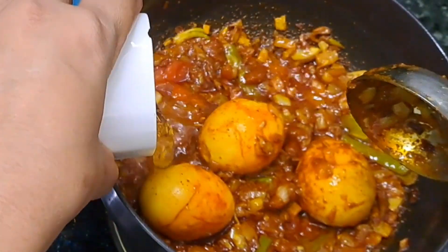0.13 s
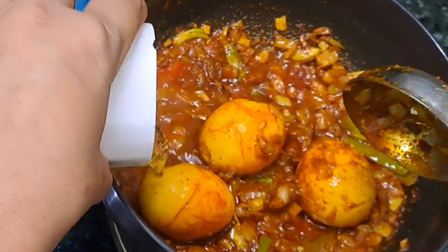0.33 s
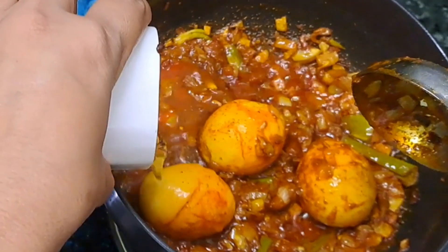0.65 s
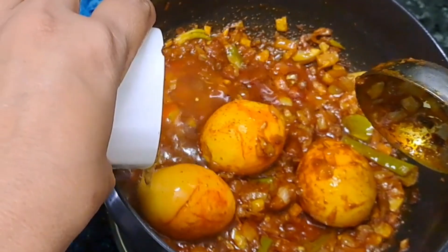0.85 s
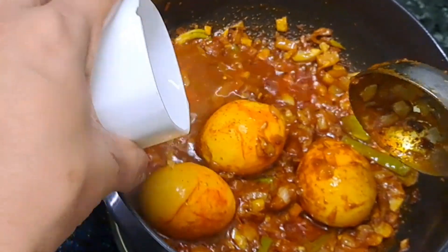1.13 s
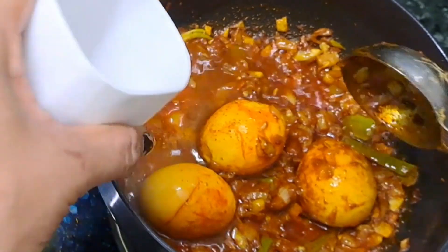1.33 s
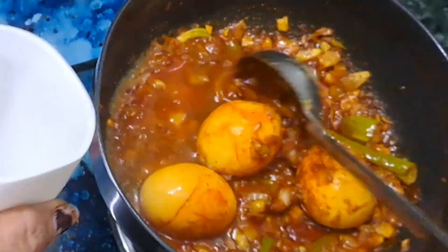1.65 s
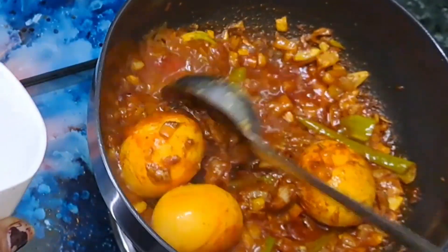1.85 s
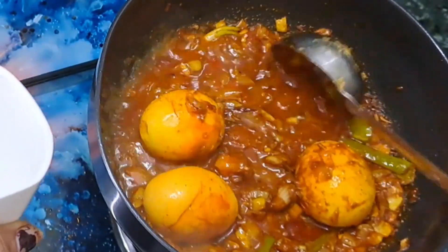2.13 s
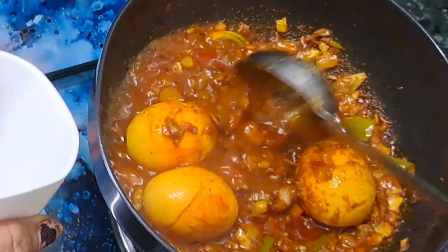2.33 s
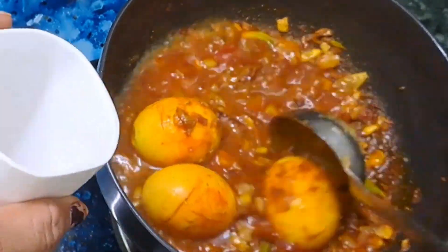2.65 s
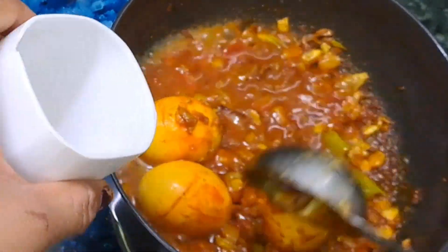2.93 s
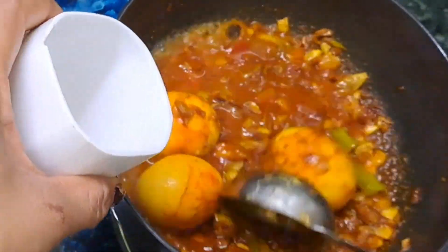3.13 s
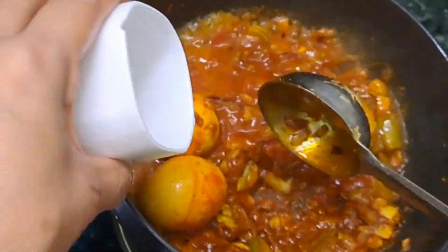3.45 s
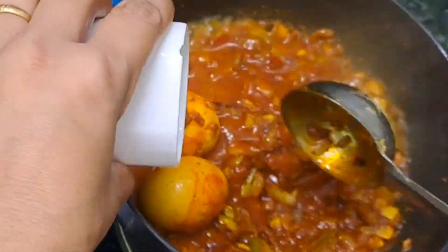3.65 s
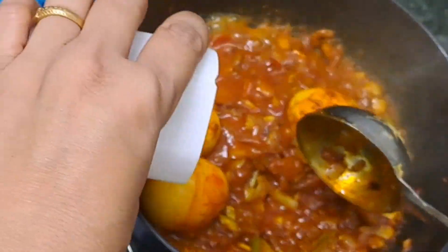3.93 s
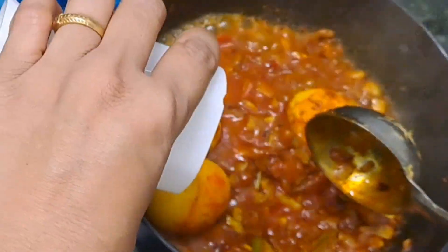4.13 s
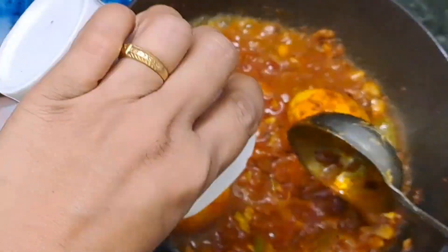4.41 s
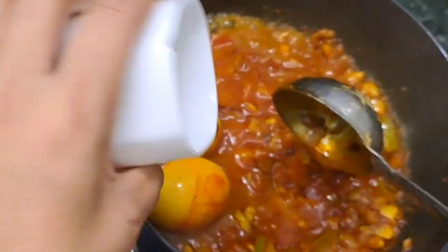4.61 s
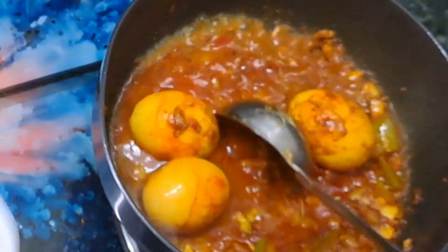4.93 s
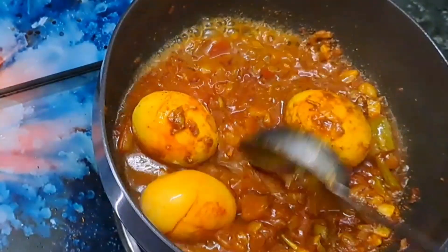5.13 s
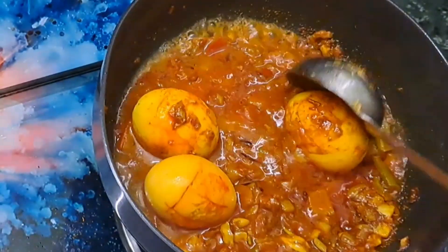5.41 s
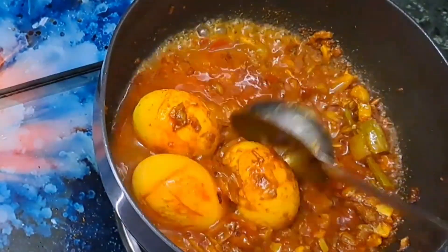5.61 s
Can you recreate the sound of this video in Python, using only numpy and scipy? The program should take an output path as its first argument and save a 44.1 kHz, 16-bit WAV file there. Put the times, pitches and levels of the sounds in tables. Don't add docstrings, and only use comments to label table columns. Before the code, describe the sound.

A very close stereo sizzle of thick sauce in a hot metal pan, in a small home kitchen with a faint low fan hum. From 0 to 0.9 s the frying is fairly thin and crackly: a sharp tick at the start, many tiny oil spits, and a cluster of hard cracks near 0.4 s. From about 0.9 s the added water thickens it into dense, wet boiling, strongest around 2 to 2.4 s, the separate pops drowned. From 1.3 s onward brief, high metallic rings, like tiny tinny chirps, dart through the hiss as the ladle stirs. The boil eases by 2.8 s, then flares around 3.5 s with loud snaps leaning left and a brighter, finer fizz. After 4 s it gradually sinks to a softer, steady, fine hiss with sparser rings. One faint dull ladle thud comes at 5.55 s, and the sizzle continues to the end near 6 s.

```python
import sys
import numpy as np
from scipy import signal
from scipy.fft import rfft, irfft
from scipy.io import wavfile
from scipy.ndimage import uniform_filter1d

SR = 44100
rng = np.random.default_rng(int(sys.argv[2]) if len(sys.argv) > 2 else 0)


def ratio_of_db(decibels):
    return 10 ** (np.asarray(decibels, float) / 20)


def digitize_waveform(pressure):
    field = np.atleast_2d(pressure).T
    bounded = np.clip(field, -1, 1)
    quanta = np.round(bounded * 32767).astype(np.int16)
    wavfile.write(sys.argv[1], SR, quanta)


N = 254456

# (time [s], boiling strength [dB], fineness of the bubbles [dB])
BOIL_COURSE = [(0, -37.5, 2), (.3, -38.5, 3), (.84, -35, 1), (.92, -31.5, 1.5), (1.32, -28.5, -1.5),
               (1.8, -26.5, -1), (1.98, -24, 0), (2.38, -25, 0), (2.8, -28, -1), (2.96, -27.5, 2),
               (3.4, -27, 1.5), (3.57, -24.5, 2.5), (3.75, -25.5, 4), (4.05, -27.5, 5), (4.25, -29, 4),
               (5.0, -31.5, 4.5), (5.38, -32.5, 4), (5.6, -31, 4)]
# (frequency [Hz], gain [dB])
LEFT_RESPONSE = [(450, -29.5), (720, -21), (765, -14), (1200, -15.5), (2050, -11.5), (2880, -6), (3060, -4),
                 (4900, 2.5), (6000, -1), (7200, -13), (8800, -13), (10800, -6), (13000, -19), (15400, -17)]
# (frequency [Hz], gain [dB])
RIGHT_RESPONSE = [(450, -31), (720, -23), (765, -15), (1250, -14), (1600, -16.5), (2000, -15.5),
                  (2900, -10.5), (4500, -8.5), (6300, -12.5), (7200, -8.5), (9800, -16.5), (11600, -9),
                  (13300, -14.5), (15400, -9)]


def evened(x):
    return x / np.sqrt(np.mean(x ** 2) + 1e-20)


def read_spectrum(points, hz):
    f, value = np.transpose(points)
    return np.interp(np.log(hz + 1), np.log(f + 1), value)


def curve(rows, column):
    rows = np.array(rows)
    return np.interp(np.arange(N) / SR, rows[:, 0], rows[:, column])


def bumps(rows, order=2):
    t = np.arange(N) / SR
    return np.array([np.exp(-abs((t - row[0]) / row[2]) ** order) for row in rows])


def wander(per_s):
    return evened(signal.lfilter(*signal.butter(2, per_s, fs=SR), rng.standard_normal(N)))


def add(mix, s, sound):
    part = mix[..., round(s * SR):][..., :sound.shape[-1]]
    part += sound[..., :part.shape[-1]]


def ring(x, hz, width):
    return signal.lfilter(*signal.iirpeak(hz, hz / width, SR), x)


def resonate(x, hz, width, order=1):
    turn = np.exp(2j * np.pi * np.cumsum(hz) / SR)
    r = np.exp(-np.pi * width / SR)
    low = x / turn
    for _ in range(order):
        low = signal.lfilter([1 - r], [1, -r], low)
    return 2 * (turn * low).real


def causal(points):
    log_gain = np.log(ratio_of_db(read_spectrum(points, abs(np.fft.fftfreq(4096, 1 / SR)))))
    phase = -signal.hilbert(log_gain).imag
    return np.fft.ifft(np.exp(log_gain + 1j * phase)).real[:2048]


def through_ports(x):
    ports = np.array([causal(LEFT_RESPONSE), causal(RIGHT_RESPONSE)])
    return signal.oaconvolve(x, ports, axes=1)[:, :N]


def bursts(per_s, spread_db, lead, scatter):
    when = np.flatnonzero(rng.random(N) < per_s / SR)
    chance, sign, place = rng.standard_normal((3, len(when)))
    size = ratio_of_db(spread_db * np.minimum(chance ** 2, 4)) * np.sign(sign)
    lead = np.round(lead + scatter * place * abs(place)).astype(int)
    early = np.clip(when - lead, 0, N - 1)
    return np.array([np.bincount(when, size, N), np.bincount(early, size, N)])


def hot_spots(x, patchy_db, wide, long):
    z = signal.stft(x, nperseg=256, noverlap=192)[2]
    patches = rng.standard_normal(z.shape[1:])
    for _ in range(2):
        patches = uniform_filter1d(patches, wide, 0)
        patches = uniform_filter1d(patches, long, 1)
    patchy = z * ratio_of_db(patchy_db * evened(patches))
    return signal.istft(patchy, nperseg=256, noverlap=192)[1][:, :N]


def boil():
    # (time [s], gain [dB], half length [s], extra for small bubbles [dB])
    flares = [
        (0, 0, 0.0087, 9.5),
        (0.13, 1.5, .05, -1.5),
        (0.388, 2, .011, 2),
        (0.638, 2, .025, -2),
        (0.694, 3, 0.017, -1.5),
    ]
    # (time [s], change [dB], half length [s])
    bowl_changes = [
        (1.1, -10, 0.74),
        (4.45, 7, 1),
    ]
    full_boil_db = -24.5
    t = np.arange(N) / SR
    strength_db, fine_db = curve(BOIL_COURSE, 1), curve(BOIL_COURSE, 2)
    flare_db, small_db = np.transpose(flares)[[1, 3]] @ bumps(flares)
    below_db = strength_db - full_boil_db
    large_db = full_boil_db - 8 + 0.84 * below_db - 0.34 * fine_db
    levels_db = np.array([large_db, strength_db, strength_db + fine_db + small_db]) + flare_db
    loose_spits_db = -15.5 - 0.69 * below_db
    bowl_db = -6 + np.transpose(bowl_changes)[1] @ bumps(bowl_changes, order=3)
    lean_db = 0.53 * (t - t.mean())
    return levels_db, loose_spits_db, bowl_db, lean_db


def sizzle():
    # (frequency [Hz], width [Hz], level [dB])
    wall_modes = [(589, 9.5, -7.5), (654, 14, -21), (780, 23, -13), (1424, 38, -14), (1520, 40, -14.5),
                  (1658, 140, -15.5)]
    # (frequency [Hz], width [Hz], level [dB])
    bowl_modes = [(3130, 54, -16), (3770, 40, -4), (4990, 240, -6.5), (5910, 360, -10.5), (11830, 800, -2)]
    # (time [s], high pitch [Hz], boost [dB], low pitch [Hz], boost [dB])
    air_gap = [(0, 3650, -18, 1005, 2), (.92, 3340, -3, 1027, 5), (1.3, 3400, -2.5, 976, 0),
               (1.72, 3750, -4.5, 945, 3), (2.4, 3670, -12, 1000, -8), (3.2, 3450, -14, 940, -10),
               (3.5, 3500, -7, 1015, -4), (4.2, 3860, -35, 1034, 2), (5.77, 3740, -27, 1003, -3)]
    levels_db, loose_spits_db, bowl_db, lean_db = boil()
    spurts_db, loose_gain = wander(31), ratio_of_db(loose_spits_db)
    low_hz, high_hz = 2800, 7500
    # (band edge [Hz], filter, depth of spurts, loose spits [dB], wide spits [dB])
    sizes = [(low_hz, "low", .2, .3, -8),
             ((low_hz, high_hz), "band", .6, -2, -3),
             (high_hz, "high", .7, 2.5, 0.)]
    wide_spits = evened(bursts(300, 1.33, 8.6, 4))
    out = np.zeros((2, N))
    for level_db, (edge, kind, shared_db, loose_db, wide_db) in zip(levels_db, sizes):
        fizz = evened(bursts(9000, 1.3, 4.5, 3.0)) * ratio_of_db(shared_db * spurts_db)
        loose = ratio_of_db(loose_db) * evened(bursts(300, 3.8, 4.5, 3)) + ratio_of_db(wide_db) * wide_spits
        fizz = hot_spots(fizz, 1.0, wide=3, long=14) + loose * loose_gain
        size_band = signal.butter(6, edge, kind, fs=SR, output="sos")
        fizz = signal.sosfilt(size_band, through_ports(fizz))
        if kind == "low":
            fizz = fizz + sum(ratio_of_db(db + 12.0) * ring(fizz, hz, w) for hz, w, db in wall_modes)
            fizz = fizz + ratio_of_db(curve(air_gap, 4)) * resonate(fizz, curve(air_gap, 3), 33)
        else:
            fizz = fizz + ratio_of_db(bowl_db) * sum(ratio_of_db(db) * ring(fizz, hz, w) for hz, w, db in bowl_modes)
        if kind == "band":
            fizz = fizz + ratio_of_db(curve(air_gap, 2)) * resonate(fizz, curve(air_gap, 1), 1200, order=2)
        loudness = (1 + loose_gain ** 2) * np.mean(fizz.mean(0) ** 2)
        out += fizz / np.sqrt(loudness) * ratio_of_db(level_db)
    return out * ratio_of_db(np.outer([.15, -.5], lean_db))


def kitchen():
    # (frequency [Hz], density [dB per Hz])
    room_spectrum = [(15, -37), (25, -11), (75, 3.5), (101, -2.5), (183, -12.5), (303, -4), (352, -6),
                     (414, -4.5), (500, -6), (650, -16), (1100, -120)]
    # (frequency [Hz], left-right likeness [0..1])
    coherence = [(30, 1), (100, 0.68), (160, 0.2), (270, 0.96), (700, 0.21)]
    # (time [s], peak level [dB], half length [s])
    hum_swells = [(0, -54, 0.08), (.18, -56, 0.037), (.42, -54, 0.22), (0.776, -50, 0.1),
                  (1.078, -58, 0.093), (1.33, -54, .04), (1.553, -54, 0.076), (1.88, -50, .07),
                  (2.08, -54, .1), (2.33, -53, 0.086), (2.76, -50, 0.11), (3.12, -60, .07),
                  (3.335, -55, .07), (3.915, -58, .04), (4.222, -53, .07), (4.752, -61, 0.23),
                  (5.15, -50, .14), (5.462, -53, .06), (5.76, -55, 0.091)]
    # (frequency [Hz], width [Hz], level [dB])
    fan_tones = [(297.9, 13, -68), (401.8, 2.3, -65.5)]
    hz = np.fft.rfftfreq(N, 1 / SR)
    left, other = rfft(rng.standard_normal((2, N)))
    same = np.clip(read_spectrum(coherence, hz), 0, 1)
    right = same * left + np.sqrt(1 - same ** 2) * other
    pair = np.array([left, right]) * ratio_of_db(read_spectrum(room_spectrum, hz))
    bass = 1 / (1 + (hz / 105) ** 8)
    air = ratio_of_db(-57) * evened(irfft(pair * np.sqrt(1 - bass), N))
    rumble = evened(irfft(pair * np.sqrt(bass), N))

    turns = np.cumsum(19.9 * (1 + 0.018 * wander(2.8))) / SR
    orders = [(3, -8), (4, -1), (5, -9)]  # (multiple, level [dB])
    blades = evened(sum(ratio_of_db(db) * np.sin(2 * np.pi * (k * turns + rng.random())) for k, db in orders))
    swell = ratio_of_db(-66.5) + ratio_of_db(np.transpose(hum_swells)[1]) @ bumps(hum_swells, order=3)
    hum = swell * (0.37 * rumble + 0.51 * blades)

    tones = np.zeros(N)
    for f, w, db in fan_tones:
        tones += ratio_of_db(db) * evened(ring(ring(rng.standard_normal(N), f, w), f, w))
    tones = tones * ratio_of_db(3.0 - 1.04 * np.arange(N) / SR)
    hiss_db = curve(BOIL_COURSE, 1) + curve(BOIL_COURSE, 2)
    duck_db = -.35 * np.maximum(hiss_db + 29.5, 0)
    return (air + tones) * ratio_of_db(1.5 + duck_db) + hum * ratio_of_db([[.7], [-.7]])


def cracks():
    # (time [s], peak level [dB], left-right difference [dB])
    oil_cracks = [(.0005, -10, 4), (0.378, -9, -2), (.3803, -15, 3), (.3847, -17, 4), (.3902, -20, 3),
                  (0.392, -16, 3), (3.516, -4, 9), (3.5565, -8, 7)]
    clicks = np.zeros((2, N))
    for s, db, pan_db in oil_cracks:
        sides_db = np.array([[pan_db / 2 + 13.0], [-pan_db / 2 + 1.0]])
        add(clicks, s, np.array([[0.92, -0.84]]) * ratio_of_db(db + sides_db))
    return through_ports(clicks)


def spits():
    # (time [s], peak level [dB])
    small_spits = [(.056, -28), (.0987, -26), (.1027, -25), (.1292, -23), (.1484, -18), (.1795, -26),
                   (.194, -23), (.2638, -28), (.3022, -28), (.3187, -24), (.3411, -26), (.3774, -20),
                   (.4194, -21), (.4383, -20), (.4796, -25), (.5227, -27), (.5282, -29), (.6399, -31),
                   (.7821, -24), (.7966, -24), (.8106, -21), (.819, -20), (.8684, -31), (.8984, -24),
                   (0.904, -20), (.9782, -28)]
    # (time [s], peak level [dB], pitch [Hz])
    middle_spits = [(.0588, -31, 4990), (.098, -21.5, 4880), (.1251, -30, 5080), (.1307, -26, 5220),
                    (.243, -30, 6230), (.303, -28, 5390), (.3637, -28, 5300), (.3745, -28, 5180),
                    (.42, -35, 4850), (.4708, -31, 5210), (.523, -29, 4400), (.5268, -28, 5250),
                    (.5646, -30, 5110), (.624, -29, 4190), (.632, -25, 5230), (.686, -25, 4160),
                    (.7472, -31, 3770), (.8066, -28, 5100), (.8986, -30, 4860)]
    out, t = np.zeros((2, N)), np.arange(600) / SR
    small = [(s, db, 11500 * (1 + 0.088 * rng.uniform(-1.1, 1))) for s, db in small_spits]
    # (spits, cycles to the peak, trim [dB], left-right difference [dB])
    kinds = [(small, 3.0, 1.5, 4), (middle_spits, 1.5, 2.5, 11)]
    for rows, cycles, trim_db, pan_db in kinds:
        sides_db = np.array([[pan_db / 2], [-pan_db / 2]])
        for s, db, hz in rows:
            age = t * hz / cycles
            pop = np.sin(2 * np.pi * hz * t) * age * np.exp(1 - age)
            spray = signal.oaconvolve(rng.standard_normal((2, len(t))), pop[None, :40], axes=1)[:, :len(t)]
            burst = pop + 0.2 * evened(spray) * np.exp(-t / 0.0071)
            add(out, s + .0004, burst * ratio_of_db(db + trim_db + sides_db))
    return out


def chance_rings():
    # (lowest [Hz], highest [Hz], level over the boil [dB], spread [dB])
    ring_bands = [(751, 805, -19, 0), (910, 980, -11, 11.5), (3020, 3800, -1, 7), (4400, 4700, 4, 3)]
    stir_from_s, count = 1.0, 16
    rows, strength_db = [], curve(BOIL_COURSE, 1)
    for low_hz, high_hz, over_db, spread_db in ring_bands:
        for when, pitch, size in rng.random((count, 3)):
            s = stir_from_s + when * (N / SR - stir_from_s)
            hz = low_hz + pitch * (high_hz - low_hz)
            db = strength_db[int(s * SR)] + over_db + spread_db * (2 * size - 1)
            rows.append((s, hz, db))
    return rows


def rings():
    # (time [s], pitch [Hz], peak level [dB])
    clear_rings = [(1.297, 4600, -12), (1.329, 3460, -18), (1.353, 4360, -18), (1.438, 5000, -13),
                   (1.686, 5160, -17), (1.695, 4140, -18), (1.72, 4300, -15), (1.741, 4200, -11),
                   (1.901, 4100, -10.5), (1.936, 3560, -12), (2.084, 4800, -11), (2.287, 4900, -14),
                   (2.392, 5700, -11), (2.453, 4470, -15), (2.525, 5960, -12), (2.579, 5800, -12),
                   (2.74, 5940, -15), (2.997, 5400, -17), (3.484, 3440, -12.5), (3.492, 4400, -11),
                   (3.55, 4820, -8), (3.624, 6000, -10), (3.788, 4900, -11), (3.799, 3780, -16),
                   (4.104, 5200, -9), (4.68, 4880, -12.5), (4.801, 4400, -43), (4.876, 4800, -19),
                   (4.313, 5300, -18)]
    out = np.zeros((2, N))
    rows = [*clear_rings, *chance_rings()]
    for (s, hz, db), (place, glide) in zip(rows, rng.random((len(rows), 2))):
        life = .0032 * (4500 / hz) ** .5
        t = np.arange(0, 10 * life, 1 / SR)
        turns = hz * t * (1 + .012 * (2 * glide - .8) * (t / life - 2))
        port_phase = np.array([[place], [0]]) * min(hz / 3000, 1)
        tone = np.sin(2 * np.pi * (turns + port_phase))
        right_db = read_spectrum(RIGHT_RESPONSE, hz) - read_spectrum(LEFT_RESPONSE, hz)
        ports_db = np.array([[0], [right_db]])
        add(out, s, ratio_of_db(db - 6 + ports_db) * tone * t / life * np.exp(1 - t / life))
    return out


def ladle():
    # (time [s], pitch [Hz], level [dB], 60 dB decay time [s])
    thud = (5.548, 232, -41, .15)
    s, hz, db, t60 = thud
    out, t = np.zeros(N), np.arange(SR // 5) / SR
    onset = 1 - np.exp(-t / .012)
    add(out, s, ratio_of_db(db - 60 * t / t60) * onset * np.sin(2 * np.pi * hz * t))
    return out


def scene():
    return sizzle() + kitchen() + cracks() + spits() + rings() + ladle()


def band_limit(x):
    return signal.sosfilt(signal.butter(12, 16840, fs=SR, output="sos"), x)


def record(dry):
    edge = signal.firwin(1201, 15480, window=("kaiser", 9), fs=SR)
    mix = signal.oaconvolve(dry, edge[None], "same", axes=1)
    return band_limit(mix)


dry = scene()
out = record(dry)
digitize_waveform(out)
```